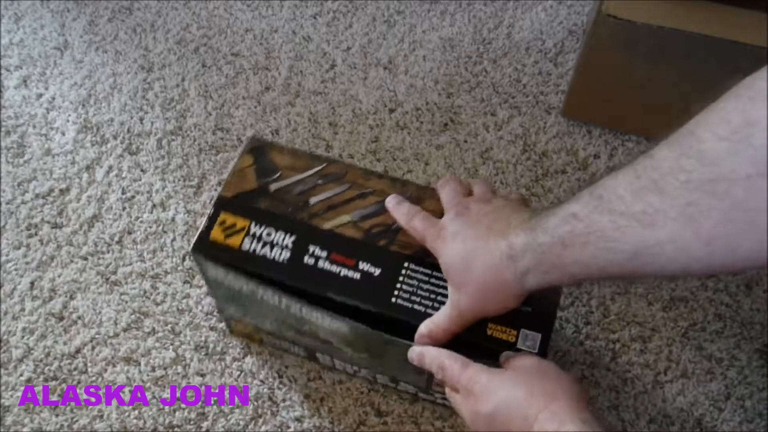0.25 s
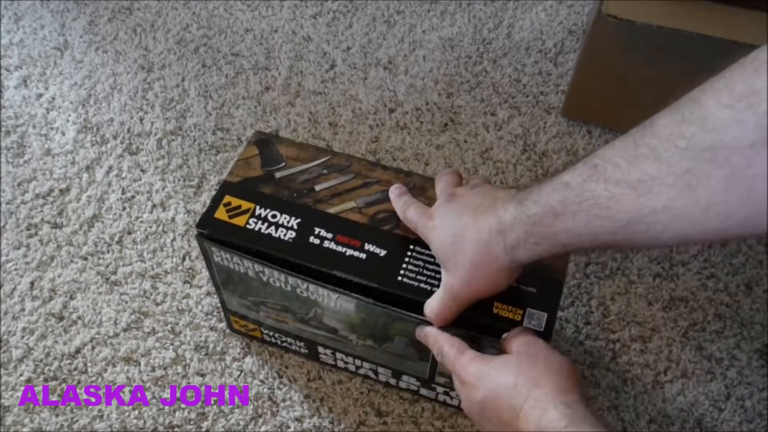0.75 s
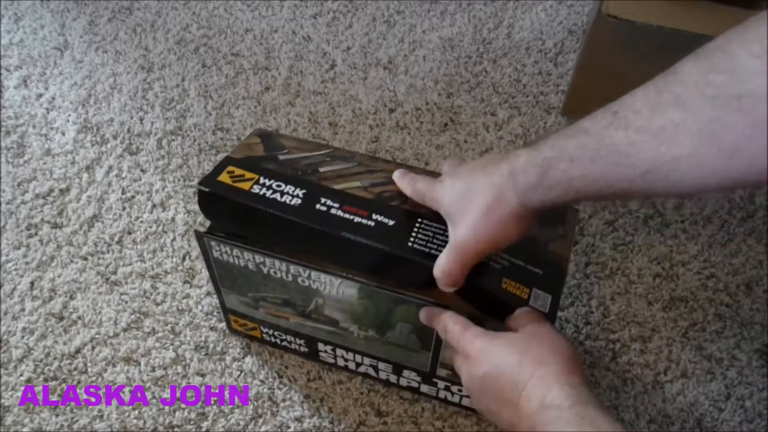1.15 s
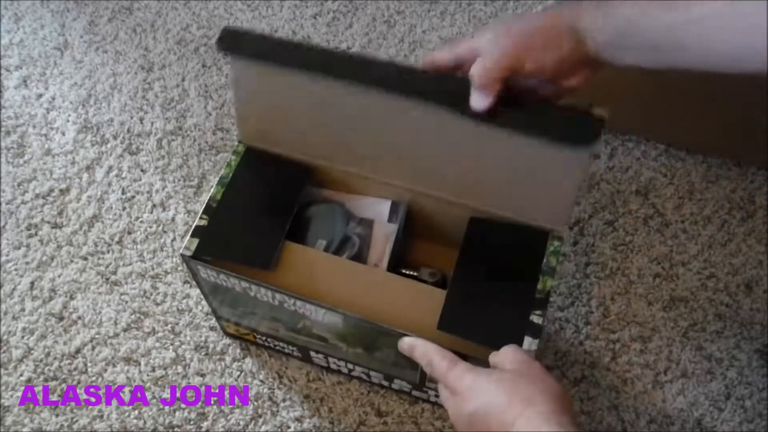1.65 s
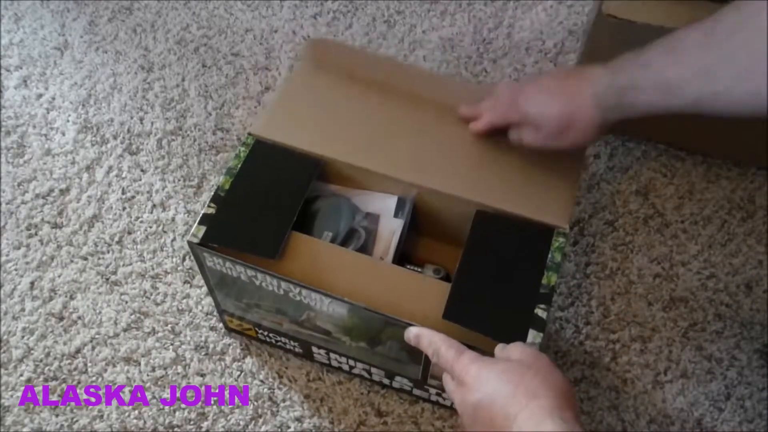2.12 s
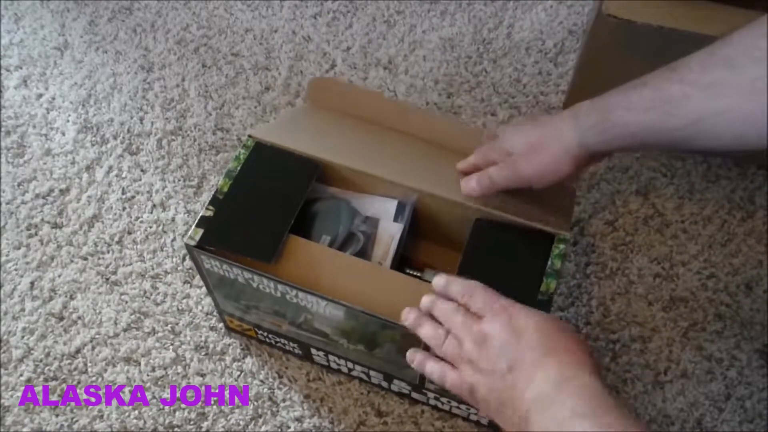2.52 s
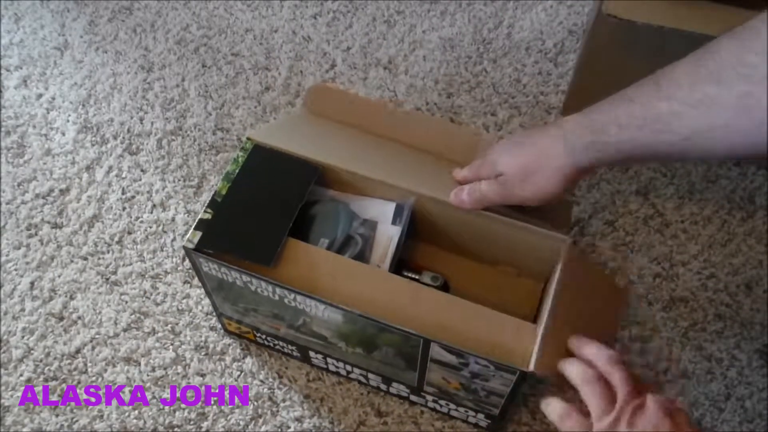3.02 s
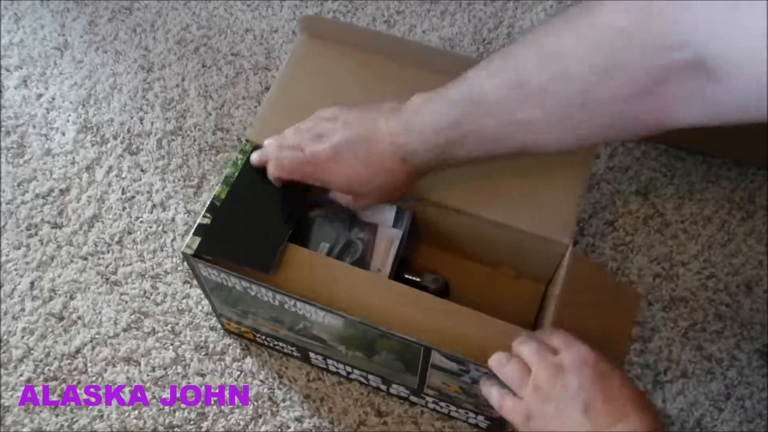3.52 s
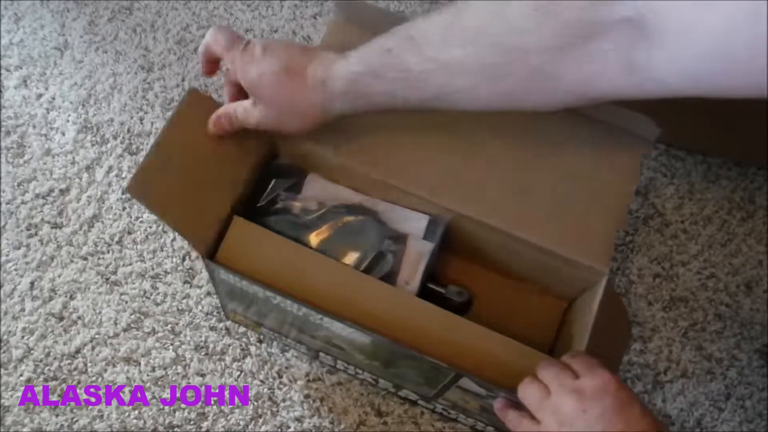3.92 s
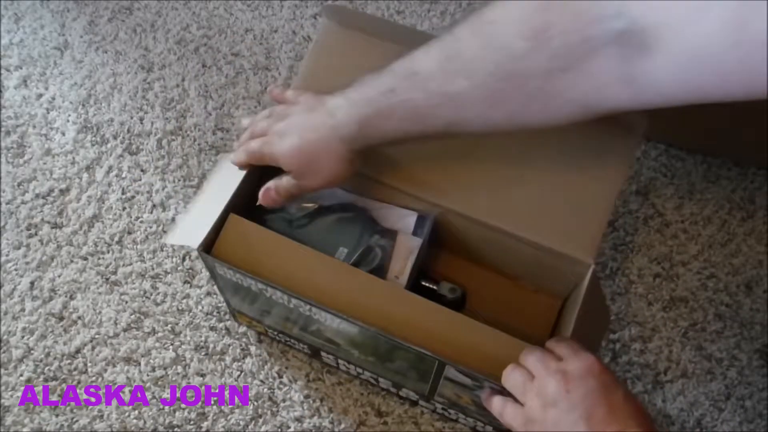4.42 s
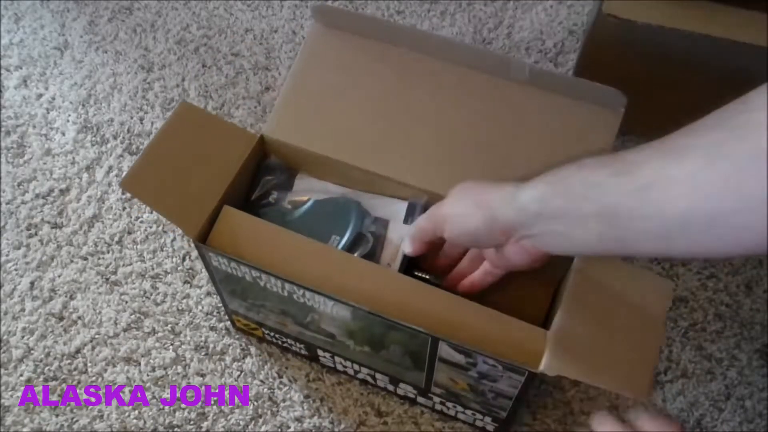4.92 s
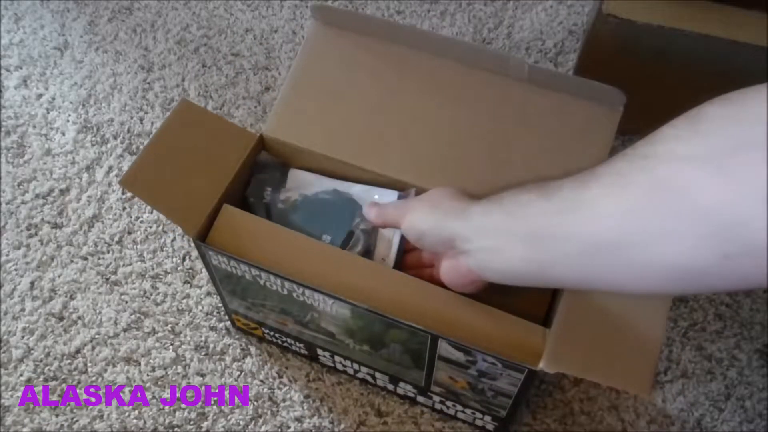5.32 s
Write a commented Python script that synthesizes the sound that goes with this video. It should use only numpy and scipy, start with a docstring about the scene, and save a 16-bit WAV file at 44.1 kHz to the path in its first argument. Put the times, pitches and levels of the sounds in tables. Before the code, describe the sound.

A cardboard box is handled close by in a quiet, fairly dry room with a faint steady whirr and hiss. It begins with soft rubbing and a few light ticks. From about 0.7 seconds a tab rasps and squeals through its slot, ending in a loud snap at 0.9. At about 1.3 the lid pops free with a quick cluster of cracks and a hollow thump, followed by smaller clicks and sliding. Around 2 seconds a fold creaks and clicks, with another short creak at 2.5. Hands swish over the board in repeated strokes, with light taps and hollow bumps between 2.9 and 3.8. At about 4.2 a flap creaks and snaps sharply. More rubbing follows, with a click at 4.7. From 4.8 a thin plastic bag crinkles in sparse dry ticks, growing busier between 5.2 and 5.5 seconds.

```python
"""Opening a cardboard box.

A corrugated box is opened by hand on the carpet of a quiet room. The locking tab scrapes out of
its slot and snaps, the lid pops free, and the folds creak in stick-slip as lid and flaps bend back.
Hands slide over the board and bump the walls; at the end fingers crinkle a plastic bag inside."""
import sys
import numpy as np
from scipy import signal
from scipy.fft import rfft, irfft, next_fast_len
from scipy.io import wavfile
from scipy.ndimage import uniform_filter1d, map_coordinates

SR = 44100
rng = np.random.default_rng(int(sys.argv[2]) if len(sys.argv) > 2 else 0)


def to_wav(s):
    """Save 16-bit WAV."""
    ch = np.atleast_2d(s).T  # columns
    pcm = np.round(np.clip(ch, -1, 1) * 32767)  # PCM
    wavfile.write(sys.argv[1], SR, pcm.astype(np.int16))


N = 245195
TIME = np.arange(N) / SR
HZ = np.fft.rfftfreq(8192, 1 / SR)
# hollow box resonances: (frequency [Hz], width [Hz], level [dB])
BOX_MODES = [(90, 35, -14.5), (180, 75, -3), (266, 103, 0), (342.4, 57, 5), (445, 28, 5), (572, 57, 6.5),
             (687, 50, 3), (843, 30, 4), (1136, 41, 5), (1470, 24, -1), (1814, 16, -9), (1776, 150, -7),
             (1950, 88, -14)]


def amp(db):
    """Decibels to gain."""
    return 10 ** (np.asarray(db) / 20)


def unit(x):
    """Scale to rms 1."""
    return x / np.sqrt(np.mean(x ** 2) + 1e-20)


def along(points, hz):
    """Interpolate (frequency [Hz], value) points on a log axis."""
    knots_hz, values = np.transpose(points)
    return np.interp(np.log(hz + 1), np.log(knots_hz), values)


def wobble(knots_per_s):
    """Smooth random curve."""
    return map_coordinates(rng.standard_normal(2048), [TIME * knots_per_s], mode="wrap")


def minimum_phase(gain):
    """Quickest impulse response with this gain at each frequency."""
    cepstrum = irfft(np.log(gain))
    half = len(cepstrum) // 2
    cepstrum[1:half] *= 2
    cepstrum[half + 1:] = 0
    return irfft(np.exp(rfft(cepstrum)))


def colour(points):
    """Impulse response of a (frequency [Hz], level [dB]) spectrum."""
    return minimum_phase(amp(along(points, HZ)))


def resonator(modes):
    """Impulse response of (frequency [Hz], width [Hz], level [dB]) modes, alternating in sign."""
    return irfft(sum((-1) ** k * amp(db) * 1j * HZ * width / (hz * hz - HZ ** 2 + 1j * HZ * width)
                     for k, (hz, width, db) in enumerate(modes)))


def through(x, response):
    """Filter a long excitation; output at rms 1."""
    return unit(signal.fftconvolve(x, response)[:N])


def burst(push, response, energy_s):
    """Filter a short push; output has the energy of rms 1 held for energy_s."""
    x = signal.fftconvolve(push, response)
    return x * np.sqrt(energy_s * SR) / np.linalg.norm(x)


def fracture(t60_s, spike):
    """One sharp release and a dying shudder, spectrally flattened."""
    t = TIME[:2 * (len(HZ) - 1)]
    push = rng.standard_normal(len(t)) * amp(-60 * t / t60_s)
    push /= np.linalg.norm(push)
    push[0] = spike
    spectrum = rfft(push)
    smoothed = np.sqrt(uniform_filter1d(np.abs(spectrum) ** 2, size=150))
    return irfft(spectrum * rfft(minimum_phase(1 / smoothed)))


def grains(per_s, spread_db):
    """Tiny slips of random timing and size."""
    impulses = (rng.random(N) < per_s / SR) * rng.choice([-1, 1], N)
    return unit(impulses * amp(spread_db * np.clip(rng.standard_normal(N), -2, 2)))


def add(track, at_s, x):
    """Mix x into the track."""
    start = round(at_s * SR)
    track[start:start + len(x)] += x[:max(N - start, 0)]


def background():
    """Faint steady whirr and hiss."""
    # (frequency [Hz], level [dB])
    spectrum = [(25, -8.5), (55, -35), (88, -8.5), (130, -15), (400, -5), (950, -6), (1350, 8),
                (1900, -8.5), (3300, -11), (6300, -6.5), (8000, -14.5), (16000, -21)]
    return amp(-54) * through(rng.standard_normal(N), colour(spectrum))


def room(x, wet_db, patterns=14, delay_s=0.005):
    """Wall reflections; the echo pattern shifts as hands and flaps move."""
    # (frequency [Hz], T60 [s])
    decay = [(150, 0.33), (1000, 0.35), (5000, 0.22), (14000, 0.16)]
    out = np.zeros(N)
    for part in np.array_split(np.arange(N), patterns):
        hz, t, noise = signal.stft(rng.standard_normal(SR // 2), SR, nperseg=256)
        fade = amp(-60 * t / along(decay, hz)[:, None])
        tail = signal.istft(noise * fade, SR, nperseg=256)[1]
        add(out, part[0] / SR + delay_s, signal.fftconvolve(x[part], tail / np.linalg.norm(tail)))
    return amp(wet_db) * out


def whistle(bend=0.04, drift_hz_per_s=3500, waver_hz=60, flutter_db=2.5):
    """Sliding board sings a thin, unsteady tone, bending up as a push starts and down as it ends."""
    # box pushed round, lid pressed flat: (start [s], length [s], mid-push pitch [Hz], level [dB])
    pushes = [(.411, .195, 10470, -59), (2.09, .39, 13000, -64)]
    out = np.zeros(N)
    for at_s, length_s, mid_hz, db in pushes:
        t = np.arange(1, int(length_s * SR)) / SR
        push = np.sin(np.pi * t / length_s)
        hz = mid_hz * push ** bend + drift_hz_per_s * (t - t.mean()) + waver_hz * wobble(300)[:len(t)]
        envelope = np.sqrt(push) * amp(flutter_db * wobble(90)[:len(t)])
        add(out, at_s, amp(db) * unit(envelope * np.sin(2 * np.pi * np.cumsum(hz) / SR)))
    return out


def sliding(fall_per_rise=1.12):
    """Skin slides on board in swelling strokes: catching fibres hiss, the panels rumble."""
    # (fastest at [s], rise [s], hiss [dB], rumble [dB])
    strokes = [(0.156, 0.13, -57, -59), (0.504, 0.14, -60.5, -54), (1.244, 0.42, -50, -52),
               (1.458, 0.11, -46, -43), (1.672, 0.13, -52, -57.5), (2.133, 0.17, -45, -44.5),
               (2.455, .22, -48, -48), (2.98, .12, -48, -59), (3.146, 0.086, -40, -54.5),
               (3.474, 0.2, -49, -54.5), (3.83, 0.15, -48, -51), (4.109, 0.061, -45, -46),
               (4.24, 0.057, -43, -45), (4.461, 0.036, -43, -46.5), (4.745, 0.074, -43, -54),
               (5.102, 0.068, -49.5, -67), (5.483, 0.22, -50.5, -52.5)]
    # both: (frequency [Hz], level [dB])
    skin_spectrum = [(500, -28.5), (1100, -9), (2200, -6.5), (3500, -1.5), (4700, 0.5), (5700, 5.5),
                     (7000, -0.5), (8500, -6.5), (11500, -12), (16000, -26)]
    panel_spectrum = [(30, -27), (90, -16.5), (170, -7), (330, -6.5), (600, 5), (900, 3), (1500, 0.5),
                      (2200, 3.5), (3200, -15), (6000, -25)]
    hiss_power, rumble_power = np.zeros((2, N))
    for at_s, rise_s, hiss_db, rumble_db in strokes:
        width_s = np.where(TIME < at_s, rise_s, fall_per_rise * rise_s)
        speed = np.exp(-2 * ((TIME - at_s) / width_s) ** 2)
        hiss_power += speed * amp(hiss_db) ** 2
        rumble_power += speed * amp(rumble_db) ** 2
    fibres = grains(per_s=6000, spread_db=2.5)
    hiss = amp(3 * wobble(45)) * through(fibres, colour(skin_spectrum))
    panels = through(grains(per_s=1500, spread_db=0), colour(panel_spectrum))
    hollow = through(grains(per_s=740, spread_db=4), resonator(BOX_MODES))
    rumble = amp(-2 + 2.04 * wobble(30)) * (panels + amp(-15.5) * hollow)
    return np.sqrt(hiss_power) * hiss + np.sqrt(rumble_power) * rumble


def bumps():
    """Soft contacts of hands and flaps wake only the box modes near their own pitch."""
    # (time [s], level [dB], pitch [Hz])
    contacts = [(.907, -29, 280), (1.339, -23.5, 298), (1.351, -20, 410), (1.534, -46.5, 254),
                (2.063, -33.5, 238), (2.65, -51, 214), (3.161, -48, 676), (3.431, -36.5, 575),
                (3.481, -41.5, 179), (3.497, -32.5, 440), (4.149, -39, 516), (4.172, -45.5, 254),
                (4.741, -48.5, 650), (4.965, -46.5, 363)]
    out, box, t = np.zeros(N), resonator(BOX_MODES), TIME[:SR // 20]
    for at_s, db, hz in contacts:
        push = np.sin(2 * np.pi * hz * t) * np.exp(-0.8 * hz * t)
        add(out, at_s, amp(db) * burst(push, box, energy_s=0.0066))
    return out


def bag(pop_hz=2100, pop_db=-2.5, scatter_db=1.5):
    """Thin plastic buckles in dry ticks; each facet adds a pop of its own pitch and strength."""
    # (time [s], level [dB])
    crinkles = [(4.836, -30.5), (4.8525, -32.5), (4.9015, -30.5), (4.9425, -33.5), (5.202, -33),
                (5.235, -28), (5.2502, -31), (5.3047, -22), (5.3676, -25.5), (5.4153, -31), (5.4402, -28),
                (5.459, -24.5), (5.474, -21), (5.4948, -30.5), (5.5369, -29)]
    # (frequency [Hz], level [dB])
    film_spectrum = [(1200, -14), (2800, -6), (4400, 8), (6200, 9.5), (8000, -1.5), (11000, -10.5),
                     (16000, -48)]
    out, film = np.zeros(N), colour(film_spectrum)
    for at_s, db in crinkles:
        facet = resonator([(pop_hz * np.exp(0.1 * rng.standard_normal()), 600, 0)])
        tick = burst(fracture(t60_s=0.011, spike=0.35), film, energy_s=0.00069)
        pop = burst(fracture(t60_s=0.02, spike=0.4), facet, energy_s=0.00064)
        pop_gain = amp(pop_db + scatter_db * rng.standard_normal())
        add(out, at_s, amp(db) * (tick + pop_gain * pop))
    return out


def creaks(slip_hz=650, gap_scatter=0.35, spread_db=1.4, ring_db=-0.5, wake_s=0.0074):
    """A bending fold sticks and slips in quick, uneven runs; a shorter or tighter sheet rings higher."""
    # (start [s], length [s], level [dB], sheet pitch [ratio])
    runs = [(0.58, 0.013, -48.5, 1.1), (0.626, .012, -44.5, 0.95), (1.475, 0.033, -42, 1.37),
            (1.76, 0.041, -46, 1.2), (1.796, .015, -38, 1.01), (1.984, .03, -40, 0.43),
            (2.021, 0.0046, -17.5, 0.89), (2.042, 0.016, -25.5, 1.04), (2.06, .013, -32.5, 1.26),
            (2.529, .012, -33.5, 0.97), (2.55, 0.012, -31, 1.035), (2.942, 0.024, -46, 0.62),
            (3.392, 0.022, -45.5, 0.46), (3.474, 0.016, -37.5, 0.66), (4.179, 0.028, -41.5, 0.96),
            (4.206, 0.014, -29.5, 0.78), (4.785, 0.011, -42.5, 1.1)]
    # both: (frequency [Hz], width [Hz], level [dB])
    squeak_modes = [(4685, 83, 2), (5590, 390, 4.5), (6200, 370, -1), (7010, 490, -9), (8500, 380, -10.5),
                    (9900, 4000, -20.5)]
    sheet_modes = [(485, 76, -0.5), (880, 310, -8.5), (1287, 160, 2), (1800, 570, -2.5), (2172, 137, 10.5),
                   (2350, 100, -2.5), (2560, 350, -3)]
    out, squeak = np.zeros(N), resonator(squeak_modes)
    for at_s, length_s, db, ratio in runs:
        sheet = resonator([(hz * ratio, width, level) for hz, width, level in sheet_modes])
        gaps, sizes = rng.standard_normal((2, 64))
        slip_s = np.cumsum(np.exp(gap_scatter * gaps)) / slip_hz
        swell = np.sqrt(np.abs(np.sin(np.pi * np.minimum(slip_s / length_s, 1))))
        slips = np.bincount((slip_s * SR).astype(int), swell * amp(spread_db * sizes))
        woken = 1 - np.exp(-(length_s / wake_s) ** 2)  # very short runs hardly wake the sheet
        ring = amp(ring_db) * woken * burst(slips, sheet, length_s)
        add(out, at_s, amp(db) * (burst(slips, squeak, length_s) + ring))
    return out


def tab(rasp_db=-3.5, squeal_db=-1, wedged_at_s=0.799, wedged_width_s=0.095, release_s=0.03):
    """The tab's rough edge rasps through its slot and squeals most where it is wedged tightest."""
    # (time [s], friction [dB])
    drag = [(0.69, -61), (0.724, -31), (0.774, -40.5), (0.844, -25.5), (0.893, -41.5)]
    # (frequency [Hz], level [dB])
    rasp_spectrum = [(60, -27), (200, -8), (600, -4.5), (1000, -8), (1600, -2), (3200, -1), (4000, -6),
                     (5000, -2.5), (7000, -0.5), (9000, -12.5), (16000, -25)]
    # (frequency [Hz], width [Hz], level [dB])
    slot_modes = [(600, 59, -1), (1670, 39, -11), (3250, 50, -1), (4845, 71, 11.5), (5750, 150, 0),
                  (6530, 180, 1)]
    drag_s, drag_db = np.transpose(drag)
    outside_s = np.abs(TIME - np.clip(TIME, drag_s[0], drag_s[-1]))
    friction = amp(np.interp(TIME, drag_s, drag_db)) * np.exp(-outside_s / release_s)
    wedged = np.exp(-((TIME - wedged_at_s) / wedged_width_s) ** 2)
    slips = grains(per_s=1900, spread_db=1) * amp(1.8 * wobble(130.2))
    rasp = amp(rasp_db) * through(slips, colour(rasp_spectrum))
    squeal = amp(squeal_db) * wedged * through(slips, resonator(slot_modes))
    return friction * (rasp + squeal)


def snaps(clack_hz=2170, full_level_t60_s=0.023, t60_doubling_db=38, thump_db=-5, thump_slope=1.66):
    """Board snaps free or taps: the cut edge cracks, the free sheet clacks, the hollow box thumps."""
    # (time [s], crack [dB], clack re crack [dB])
    hits = [(0.0383, -33, -3), (.404, -36.5, 1), (0.625, -26, -5.5), (.9054, -2, -1.5), (1.3359, -5.5, 1.5),
            (1.34, -4.5, -12), (1.3458, -8, 6), (1.4102, -24.5, -3), (1.4506, -23, -7.5),
            (1.4707, -15, -8.5), (2.0245, -18.5, -1), (2.119, -19.5, -3.5), (2.393, -27.5, -10),
            (2.916, -26, -3), (3.427, -25.5, 1), (3.481, -22, -1), (3.755, -26, -12.5), (4.141, -27.5, -4),
            (4.2128, -12, -11), (4.2195, -4, -13.5), (4.4424, -27.5, -4.5), (4.722, -17.5, -11.5)]
    # both: (frequency [Hz], level [dB])
    edge_spectrum = [(1800, -55), (3500, -19), (4500, -5), (5600, 0), (6800, -3.5), (8700, -15.5),
                     (10000, -15), (12500, -24), (16000, -30)]
    sheet_spectrum = [(300, -48.5), (700, -7.5), (1000, -2.5), (1350, -4), (1800, -2.5), (2100, -4.5),
                      (2600, -1.5), (3300, -5), (4500, 1.5), (9000, -31)]
    out, edge = np.zeros(N), colour(edge_spectrum)
    sheet = irfft(rfft(colour(sheet_spectrum)) * rfft(resonator([(clack_hz, 1300, 0)])))
    thump = burst([1.], resonator(BOX_MODES), energy_s=0.00043)
    for at_s, db, clack_db in hits:
        t60_s = full_level_t60_s * 2 ** (-db / t60_doubling_db)  # softer taps shudder longer
        crack = burst(fracture(t60_s, spike=0.37), edge, energy_s=0.00037)
        clack = burst(fracture(t60_s, spike=0.33), sheet, energy_s=0.0006)
        add(out, at_s, amp(db) * (crack + amp(clack_db) * clack))
        # more sheet in motion, more thump
        add(out, at_s, amp(db + thump_db + thump_slope * clack_db) * thump)
    return out


def scene():
    """All handling sounds in the carpeted room, mono."""
    handling = snaps() + bumps() + creaks() + tab() + sliding() + bag() + whistle()
    return (handling + room(handling, wet_db=-11) + background())[None]


def record(dry):
    """Round off the highest peaks, then limit the band."""
    top_hz = 16400
    limited = dry / (1 + np.abs(dry) ** 6) ** (1 / 6)
    size = next_fast_len(N + SR // 4)
    passband = np.fft.rfftfreq(size, 1 / SR) < top_hz
    return irfft(rfft(limited, size) * passband, size)[:, :N]


dry = scene()
out = record(dry)
to_wav(out)
```